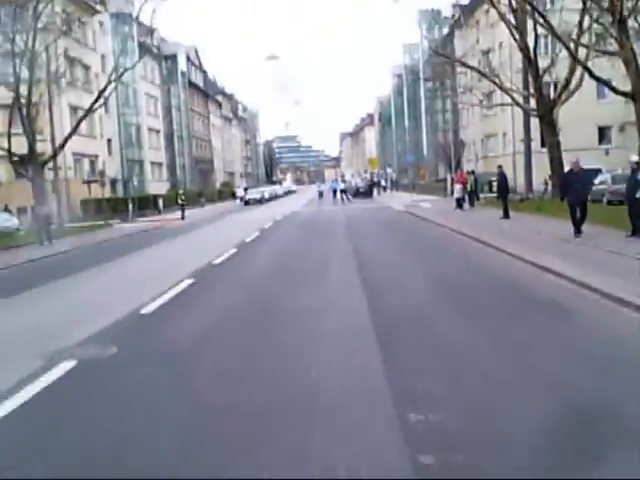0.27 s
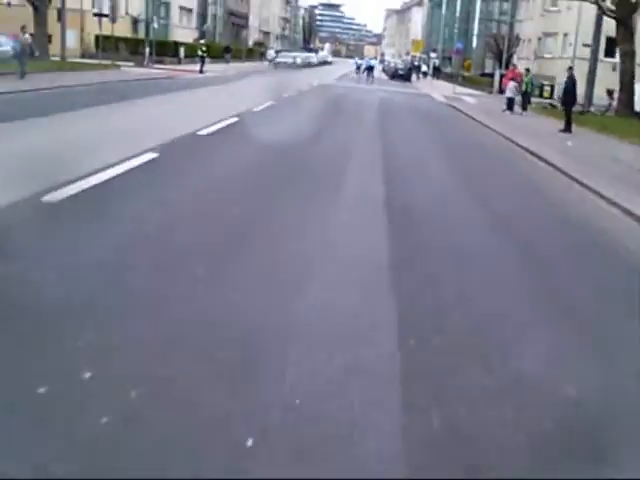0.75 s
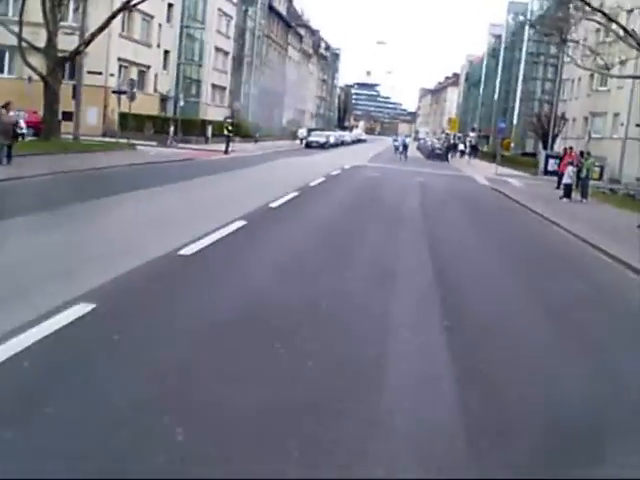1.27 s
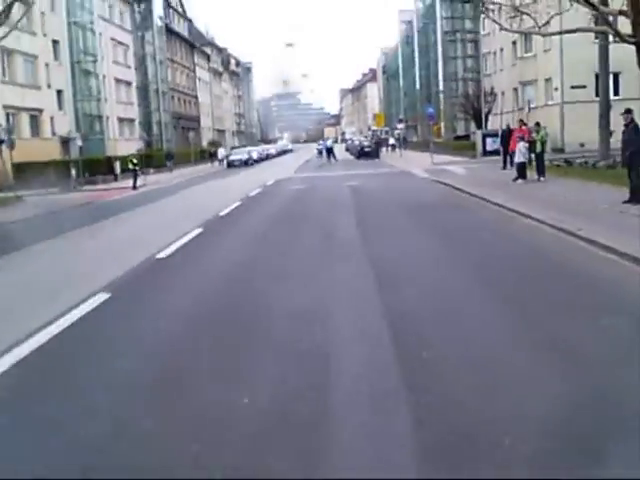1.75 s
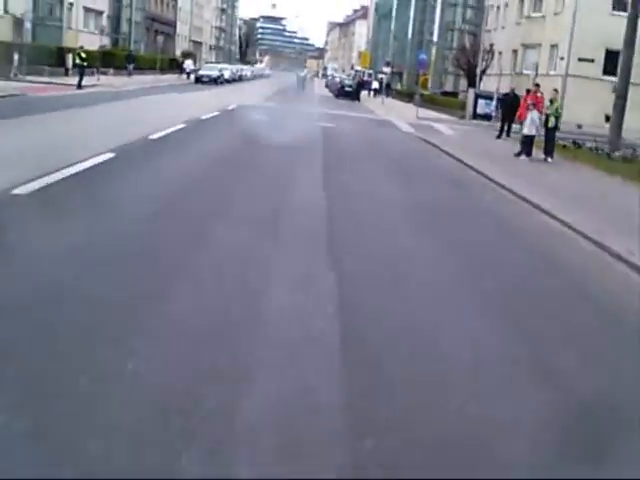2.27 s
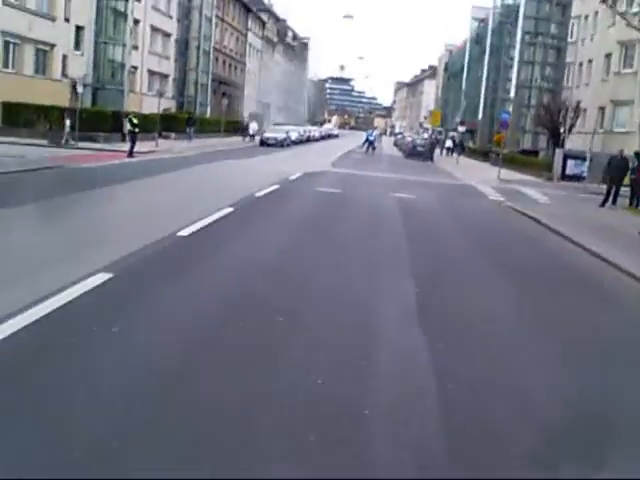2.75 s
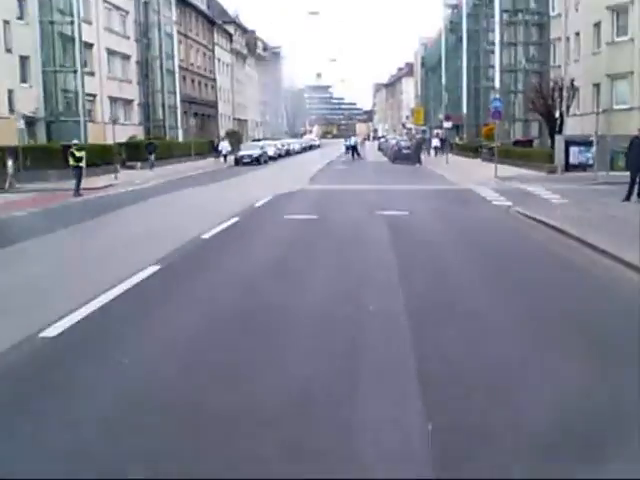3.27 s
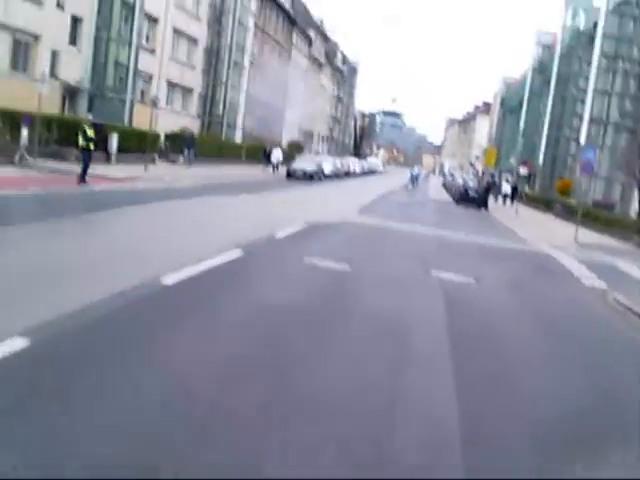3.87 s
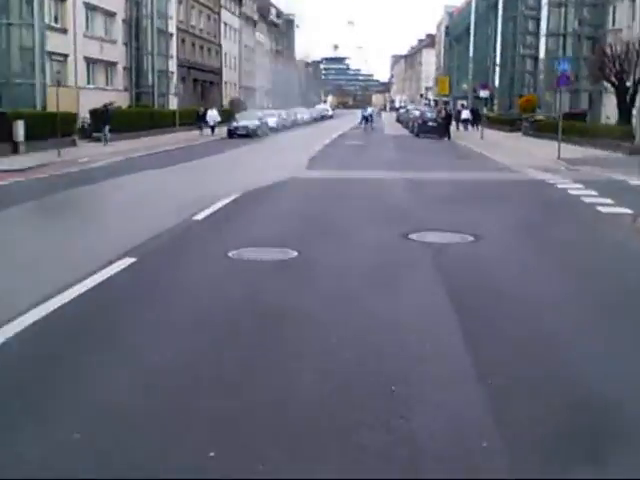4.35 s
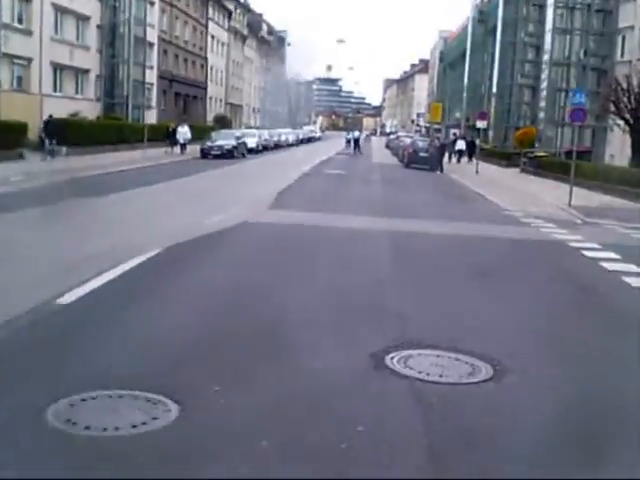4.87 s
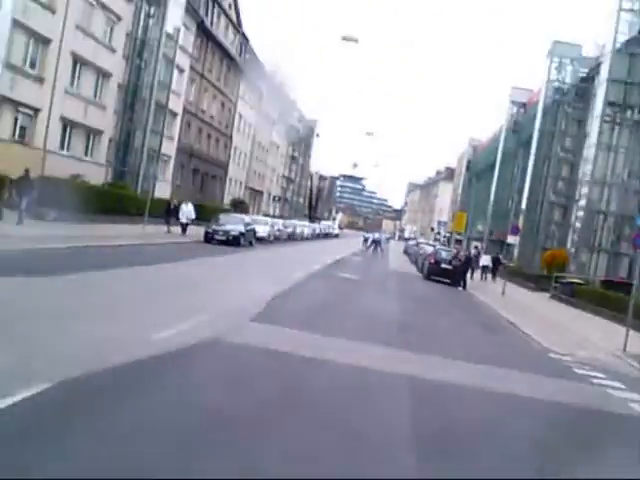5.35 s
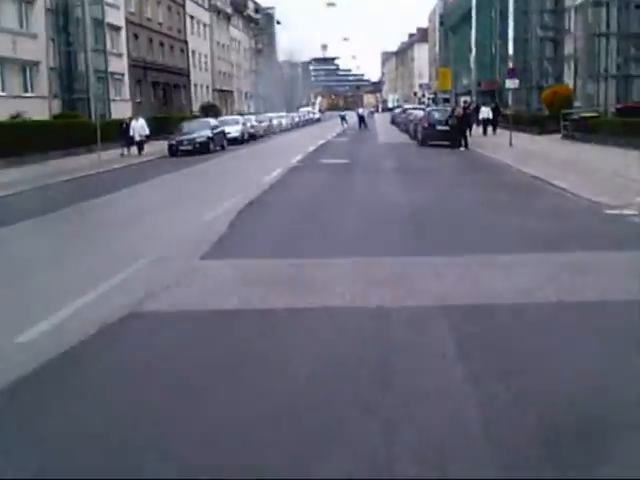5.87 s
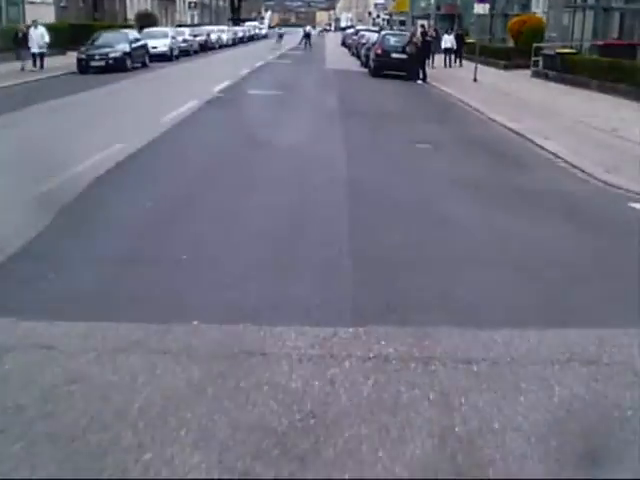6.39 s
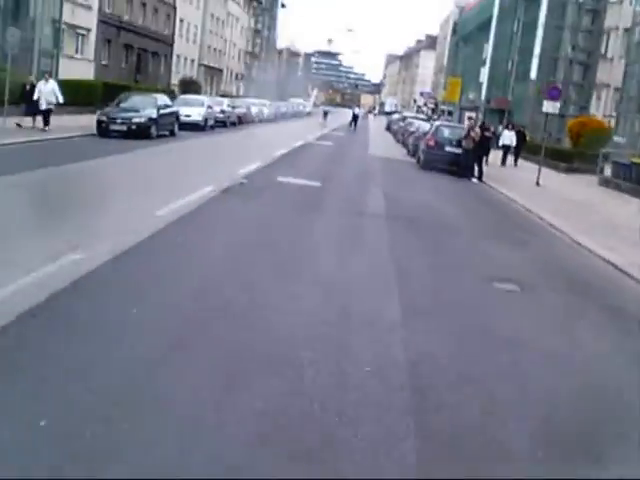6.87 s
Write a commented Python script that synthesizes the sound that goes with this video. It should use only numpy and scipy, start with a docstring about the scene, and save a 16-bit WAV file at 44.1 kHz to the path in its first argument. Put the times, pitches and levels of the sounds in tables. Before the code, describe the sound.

Skate wheels whir and clack over grit on a wet street, with brief scuffs, rhythmic swishes and a steady low flutter.

```python
"""Inline skates roll down a damp asphalt street, heard from a small camera that the skater carries.
Grit and stones strike the wheels and excite hollow resonances, which swell with a broad roar at each push.
The skates scuff by sliding friction and swish through the wet. Behind them the camera knocks in its
holder and adds its own hiss, a thin whine and a low flutter from its power supply."""
import sys
import numpy as np
from scipy import signal
from scipy.fft import rfft, irfft, next_fast_len
from scipy.io import wavfile
from scipy.ndimage import uniform_filter1d

SR = 44100
rng = np.random.default_rng(int(sys.argv[2]) if len(sys.argv) > 2 else 0)


def dump(signal):
    """Clip the signal to [-1, 1] and save it as 16-bit WAV at the path in sys.argv[1]."""
    limited = np.clip(np.atleast_2d(signal).T, -1, 1)
    pcm = np.round(limited * 32767).astype(np.int16)
    wavfile.write(sys.argv[1], SR, pcm)


N = 313945
TIME = np.arange(N) / SR


def undb(db):
    """Decibels to amplitude ratio."""
    return 10 ** (np.asarray(db) / 20)


def level(x, db):
    """Normalisation to an rms level."""
    return x * undb(db) / np.sqrt(np.mean(x ** 2))


def colour(x, spectrum):
    """Spectral shaping: gains in dB are interpolated over log frequency."""
    hz, db = np.transpose(spectrum)
    size = 2 * next_fast_len(N)
    bin_hz = np.maximum(np.fft.rfftfreq(size, 1 / SR), 1)
    gain = undb(np.interp(np.log(bin_hz), np.log(hz), db))
    return irfft(rfft(x, size) * gain)[:N]


def resonator(x, hz, width_hz):
    """Second-order resonance with unit gain at its centre."""
    return signal.lfilter(*signal.iirpeak(hz, hz / width_hz, fs=SR), x)


def lag(x, seconds):
    """Exponential relaxation with one time constant."""
    keep = np.exp(-1 / (seconds * SR))
    return signal.lfilter([1 - keep], [1, -keep], x)


def wander(rate_hz):
    """Random modulation: held values smoothed into ramps, rms 1."""
    steps = rng.standard_normal(4096)[(TIME * rate_hz).astype(int) % 4096]
    return level(uniform_filter1d(steps, int(SR / rate_hz)), 0)


def grains(per_s, spread_db):
    """Shot noise: independent impacts of random size and sign, rms 1."""
    hit = rng.random(N) < per_s / SR
    size = undb(spread_db * np.minimum(rng.exponential(size=N), 4))
    return level(hit * size * rng.choice([-1, 1], N), 0)


# Spectrum of the camera's hiss: frequency_hz, gain_db
HISS_SPECTRUM = [(20, 27), (60, 22.5), (110, 9.5), (165, 7.5), (280, 10), (380, 3.5), (550, 0), (1400, 3),
                 (2700, -0.5), (4500, -2.5), (7000, -5), (10000, -3), (11000, -11)]
# Tones of the electronics, before their flicker: pitch_hz, level_db
WHINE_TONES = [(3933, -85), (4800, -92), (5600, -83), (5633, -90), (7400, -82), (9600, -92)]


def electronics(buzz_hz=100 / 3):
    """Amplitude modulation: periodic pulses put a buzz in the hiss, and the whine flickers at random."""
    buzz = 1 + 0.53 * np.exp(-(TIME * buzz_hz % 1) / 0.27)
    hiss = level(colour(rng.standard_normal(N), HISS_SPECTRUM) * buzz, -59)
    whine = sum(level(np.sin(2 * np.pi * hz * TIME), db) for hz, db in WHINE_TONES)
    flicker = undb(-0.7 + 3.4 * wander(rate_hz=56))
    return hiss + whine * flicker


def supply_flutter(frame_hz=30, write_every_s=.1155, scatter_s=.01):
    """Load regulation: the voltage climbs as the sensor rests each frame and sags as frames are stored."""
    resting = 1. * ((TIME - .0203) % (1 / frame_hz) < .0145)
    due_s = np.arange(.083, N / SR, write_every_s)
    due_s += scatter_s * rng.standard_normal(len(due_s))
    writing = np.zeros(N)
    for end_s in np.round(due_s * frame_hz) / frame_hz - .003:  # just ahead of the nearest frame
        writing[int((end_s - .0055) * SR):int(end_s * SR)] = 1
    ripple, sag = (lag(x - x.mean(), seconds=.019) for x in (resting, writing))
    return level(ripple, -55) - level(sag, -52.5)


# Jolts of the camera body: start_s, knock_gain_db, thump_gain_db
CAMERA_JOLTS = [(0.459, -38.5, -43.5), (3.223, -46.5, -46.5), (3.351, -79, -49)]


def jolts():
    """Damped free vibration: the camera body clicks, knocks and shudders in its holder."""
    out = np.zeros(N)
    contact = level(resonator(rng.standard_normal(N), hz=1200, width_hz=2000), -17.5)
    for start_s, knock_db, thump_db in CAMERA_JOLTS:
        age = np.maximum(TIME - start_s, 0)
        modes = np.sin(2 * np.pi * 245 * age) - .5 * np.sin(2 * np.pi * 380 * age)
        knock = modes / 2 * np.exp(-age / 0.0059)
        click = contact * (age > 0) * np.exp(-age / 0.011)
        thump = np.sin(2 * np.pi * 58 * age) * (age / 0.033) * np.exp(1 - age / 0.024)
        out += undb(knock_db) * (knock + click) + undb(thump_db) * thump
    return out


# Spectrum of the wet swish: frequency_hz, gain_db
SPRAY_SPECTRUM = [(1000, -43.5), (1500, 4), (2700, -19.5), (3270, -1), (3750, -11), (5000, -8.5),
                  (6900, -3.5), (8200, -6), (9500, -13), (11000, -28.5)]
# Swells of spray, one a stride: centre_s, half_width_s, level_db
STRIDE_SWELLS = [(.33, 0.35, -76), (0.96, 0.15, -65), (1.78, 0.19, -70), (2.417, .19, -69),
                 (3.326, 0.19, -69.5), (3.87, 0.17, -69.5), (4.633, 0.15, -68), (5.36, 0.32, -74),
                 (6.09, 0.12, -70), (6.77, 0.15, -69)]


def spray(floor_db=-69):
    """Shot noise of droplets and wet rubber peeling off the road: a hiss that swells with each stride."""
    swell = sum(undb(db) * np.exp(-((TIME - centre_s) / half_width_s) ** 2)
                for centre_s, half_width_s, db in STRIDE_SWELLS)
    droplets = colour(grains(per_s=14000, spread_db=5.5), SPRAY_SPECTRUM)
    return level(droplets, 0) * (undb(floor_db) + swell)


# Skids, levelled before their envelope: start_s, decay_s, pitch_hz, level_db
SKATE_SCUFFS = [(0.202, 0.098, 1600, -63), (0.758, 0.026, 970, -57), (0.91, 0.084, 1610, -60),
                (1.614, 0.11, 1660, -60), (2.338, 0.1, 1700, -64.5), (2.814, .016, 1300, -56),
                (3.102, 0.051, 1750, -59), (3.472, 0.021, 1050, -55.5), (3.784, 0.031, 1750, -57),
                (4.061, 0.016, 1140, -53), (4.547, 0.081, 1550, -59.5), (5.965, 0.032, 1750, -56),
                (6.548, .025, 1270, -60)]


def scuffs(attack_s=.003, width_hz=650):
    """Sliding friction: the wheels skid briefly, bright as they land and duller as they lift off."""
    out = np.zeros(N)
    friction = grains(per_s=5000, spread_db=-1)
    for start_s, decay_s, hz, db in SKATE_SCUFFS:
        age = np.maximum(TIME - start_s, 0)
        envelope = (1 - np.exp(-age / attack_s)) * np.exp(-(age / decay_s) ** 2)
        skid = resonator(resonator(friction, hz, width_hz), hz, width_hz)
        out += envelope * level(skid, db)
    return out


# Hollow resonances rung by grit and stones: pitch_hz, bandwidth_hz, gain_db
HOLLOW_MODES = [(816, 310, -12.5), (1240, 99, -4), (1357, 134, 7.5), (1474, 73, -14), (1920, 150, -23)]


def hollow_ring(blows, cutoff_hz):
    """Modal superposition: blows, low-passed by the soft tyres, excite parallel resonances."""
    blunted = signal.sosfilt(signal.butter(4, cutoff_hz, fs=SR, output="sos"), blows)
    return sum(undb(db) * resonator(blunted, hz, width_hz) for hz, width_hz, db in HOLLOW_MODES)


# Single stones under a wheel: start_s, peak_db
STONE_HITS = [(0.242, -50), (0.315, -47), (0.759, -43), (1.08, -41), (1.126, -46), (1.2, -41), (1.214, -45),
              (1.285, -39), (1.327, -42), (1.377, -38.5), (1.814, -43), (1.926, -44), (1.991, -39.5),
              (2.023, -44), (2.061, -43), (2.125, -43), (3.977, -42), (4.211, -46), (6.093, -46),
              (6.568, -45), (6.836, -40), (6.863, -45), (6.873, -35), (6.914, -40.5)]


def stones(cutoff_hz=1750):
    """Impulse response: each larger stone gives one hard, hollow clack."""
    blows = np.zeros(N)
    for start_s, peak_db in STONE_HITS:
        blows[int(start_s * SR)] += undb(peak_db)
    unit_peak = np.abs(hollow_ring(signal.unit_impulse(SR), cutoff_hz)).max()
    return hollow_ring(blows, cutoff_hz) / unit_peak


# The skater leans on a skate, then unloads it: peak_s, build_s, release_s, level_db
SKATE_PUSHES = [(.995, 0.037, 0.036, -57), (1.39, 0.31, 0.035, -54.5), (1.93, 0.18, 0.13, -56.5),
                (3.28, 0.095, 0.18, -58.5), (3.98, 0.12, 0.045, -58.5), (4.69, 0.13, 0.28, -58.7),
                (5.41, 0.075, 0.051, -51), (6.08, .08, 0.15, -62.5), (6.46, 0.13, 0.085, -63),
                (6.84, 0.11, .13, -51)]


def wheel_drive_db(glide_db):
    """Addition of powers: a glide that wanders with the road, plus a swell for every push."""
    power = undb(glide_db + 2.9 * wander(rate_hz=7)) ** 2
    for peak_s, build_s, release_s, db in SKATE_PUSHES:
        width_s = np.where(TIME < peak_s, build_s, release_s)
        swell = undb(db) * np.exp(-((TIME - peak_s) / width_s) ** 2)
        power += swell ** 2
    return 10 * np.log10(power)


# Spectrum of the wheels' broad roar: frequency_hz, gain_db
ROAR_SPECTRUM = [(100, -13.5), (250, -6.5), (500, 0), (900, 3), (1700, -0.5), (2300, -3), (2900, -19.5),
                 (5000, -39), (11000, -44)]


def wheels(glide_db=-67, roar_db_per_db=0.79):
    """Roughness excitation: grit makes the wheels ring and roar; the roar grows more slowly with load."""
    drive_db = wheel_drive_db(glide_db)
    grit = grains(per_s=1500, spread_db=3)
    patches = undb(2 * wander(rate_hz=80))  # coarse and smooth stretches of road
    ring = level(hollow_ring(grit * patches, cutoff_hz=2400), -0.17)
    roar = level(colour(grains(per_s=3000, spread_db=2.5), ROAR_SPECTRUM), -7)
    roar_gain_db = glide_db + roar_db_per_db * (drive_db - glide_db)
    return ring * undb(drive_db) + roar * undb(roar_gain_db)


def scene():
    """Linear superposition of the skates and the camera's noises in one channel."""
    skates = wheels() + stones() + scuffs() + spray()
    return (skates + jolts() + supply_flutter() + electronics())[None]


def record(dry, cutoff_hz=10750, dc_offset=.0133):
    """Band limiting: the converter cuts the top and sits slightly off zero."""
    lowpass = signal.ellip(8, .3, 70, cutoff_hz, fs=SR, output="sos")
    return signal.sosfilt(lowpass, dry) + dc_offset


dry = scene()
out = record(dry)
dump(out)
```